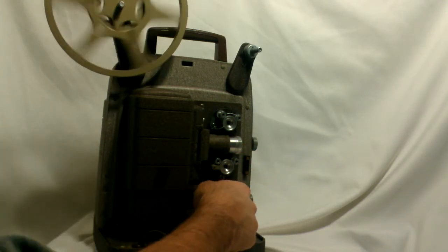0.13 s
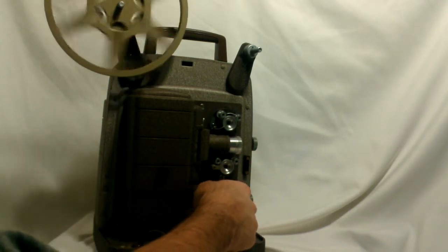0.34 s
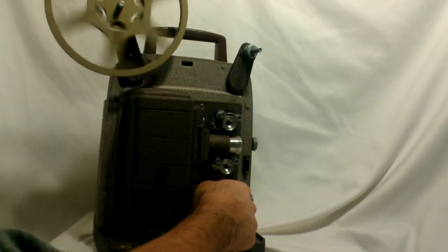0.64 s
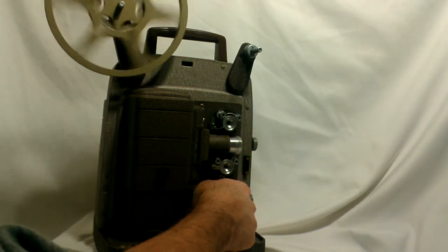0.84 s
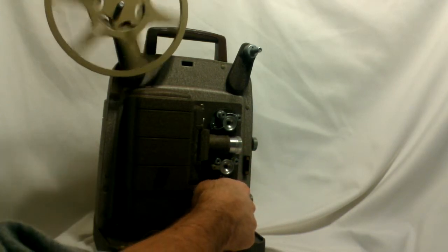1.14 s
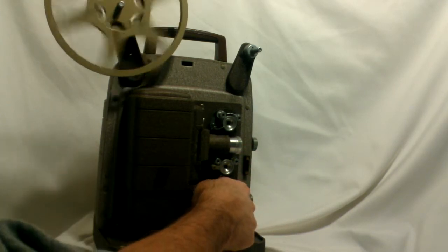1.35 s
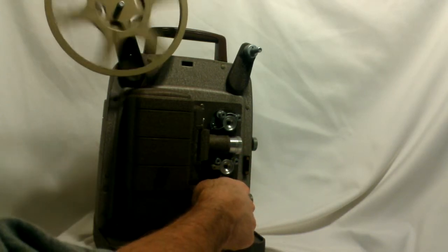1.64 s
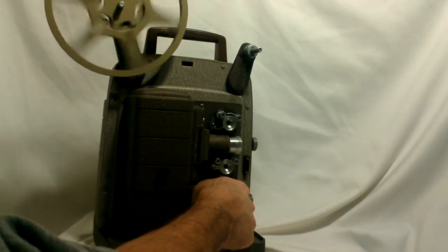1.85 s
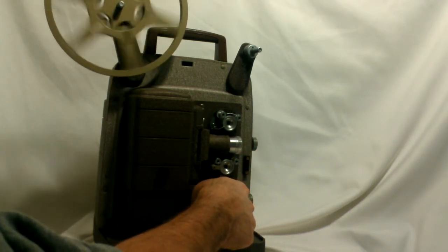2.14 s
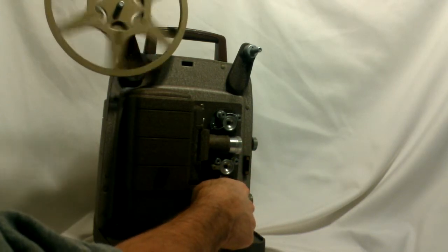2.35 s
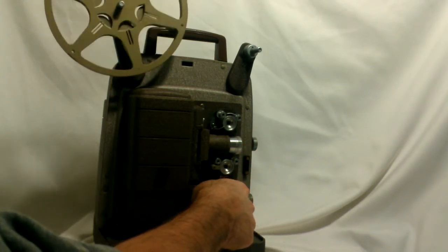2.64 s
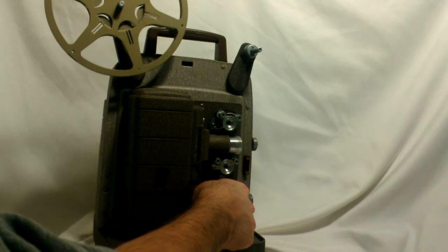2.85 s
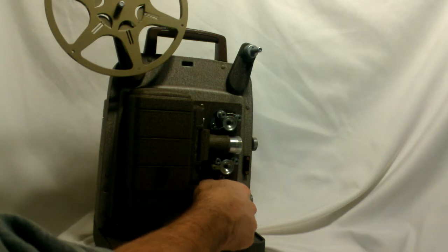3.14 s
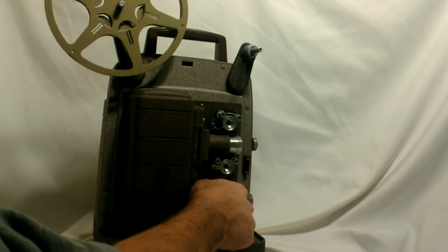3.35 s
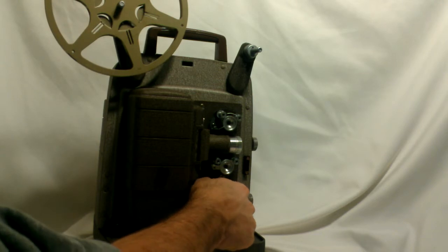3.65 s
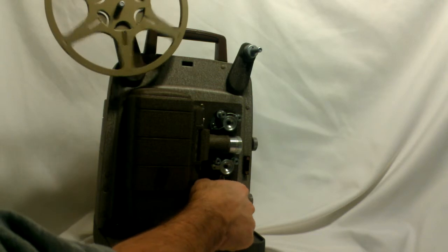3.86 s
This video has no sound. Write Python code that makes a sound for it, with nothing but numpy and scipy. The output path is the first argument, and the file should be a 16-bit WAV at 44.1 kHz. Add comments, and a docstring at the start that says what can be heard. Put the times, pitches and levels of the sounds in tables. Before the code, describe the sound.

An old film projector runs with a whirring, rattling clatter. A switch snaps off and the mechanism winds down to near silence, then another snap sets it surging again, close by in a small, fairly dry room.

```python
"""Film projector, off and on again

An old projector runs near a stereo microphone in a small draped room: gears rattle in the metal casing,
the claw ticks each frame, the motor hums and the fan whirs. A hand snaps the switch off and the works
coast down with faint ticks and creaks. The switch snaps on again and the works catch and surge."""
import sys
import numpy as np
from scipy import signal
from scipy.fft import rfft, irfft
from scipy.io import wavfile

SR = 44100
rng = np.random.default_rng(int(sys.argv[2]) if len(sys.argv) > 2 else 0)


def unload_wav(signal):
    """Save mono or channel-first audio to the path in sys.argv[1] as 16-bit WAV at rate SR, clipped to [-1, 1]."""
    wavfile.write(
        sys.argv[1],
        SR,
        np.round(np.clip(np.atleast_2d(signal).T, -1, 1) * 32767).astype(np.int16),
    )


N = 176400
TIME_S = np.arange(N) / SR
STOP_S, RESTART_S = 2.145, 3.62
STOPPED, LABOURING = TIME_S > STOP_S, TIME_S > RESTART_S   # each stays true to the end
COASTING = STOPPED & ~LABOURING
SPLIT_HZ = 1810   # divides the low and high bands of the works


def amp(db):
    """Decibels to gain."""
    return 10 ** (np.asarray(db) / 20)

def unit_rms(x):
    """Scales a signal to rms 1."""
    return x / np.sqrt(np.mean(x ** 2) + 1e-20)

def at_hz(curve, hz):
    """Reads a curve along a log frequency axis."""
    freqs, values = np.transpose(curve)
    return np.interp(np.log(hz + 1), np.log(freqs), values)

def filtered(x, kind, hz, order=2):
    """Butterworth filter."""
    return signal.sosfilt(signal.butter(order, hz, kind, fs=SR, output="sos"), x)

def drift(rate_hz):
    """Slow random wander, spread 1."""
    pole = np.exp(-80 * np.pi * rate_hz / SR)
    slow = signal.lfilter([1], [1, -2 * pole, pole * pole], rng.standard_normal(N // 40 + 2002))[2000:]
    return np.interp(np.arange(N) / 40, np.arange(len(slow)), unit_rms(slow))

def clicks_at(times_s, db):
    """An impulse train from times and levels."""
    out = np.zeros(N)
    np.add.at(out, np.clip(np.asarray(times_s) * SR, 0, N - 1).astype(int), amp(db))
    return out

def ring(clicks, hz, t60_s):
    """One mode: a unit click starts a dying sine of height 1."""
    decay, step = amp(-60 / (t60_s * SR)), 2 * np.pi * hz / SR
    return signal.lfilter([0, np.sin(step)], [1, -2 * decay * np.cos(step), decay ** 2], clicks + 1e-18)

def add_burst(out, start_s, db, noise, t60_s, rise_s=.0006):
    """Mixes in noise that rises quickly and dies away."""
    start, t = int(start_s * SR), np.arange(len(noise)) / SR
    envelope = (1 - np.exp(-t / rise_s)) * amp(db - 60 * t / t60_s)
    out[start:start + len(noise)] += (envelope * noise)[:N - start]

# How alike the two sides of the microphone hear diffuse sound: freq_hz, correlation
LEFT_RIGHT_LIKENESS = [(60, .85), (130, .92), (290, .97), (630, .87), (1380, .45), (3010, .1), (6590, .2),
                       (14400, 0)]

def stereo_noise(spectrum, size, likeness=LEFT_RIGHT_LIKENESS):
    """Coloured noise, partly shared by left and right; rms 1."""
    hz = np.arange(size // 2 + 1) * SR / size
    mid, side = rfft(rng.standard_normal((2, size)))
    alike = np.clip(at_hz(likeness, hz), -1, 1)
    pair = np.sqrt(1 + alike) * mid + np.sqrt(1 - alike) * side * [[1], [-1]]
    return unit_rms(irfft(amp(at_hz(spectrum, hz)) * pair, size))

# The quiet of the room: freq_hz, density_db
ROOM_TONE_SPECTRUM = [(18, -40), (30, -17.5), (63, -3.5), (130, -13), (354, -17.5), (624, -22), (1190, -28),
                      (1700, -27.5), (2260, -29.5), (14000, -32)]

def room_tone():
    """Faint rumble and hiss all round the microphone."""
    return amp(-68) * stereo_noise(ROOM_TONE_SPECTRUM, N, likeness=[(60, .3), (200, .034)])

ROOM_T60_S, TREBLE_T60_S, TREBLE_HZ = .16, .13, 6500

def draped_room(direct, wet_db):
    """Direct sound plus a wash from nearby walls; the drapes soak up the treble sooner."""
    t = np.arange(16384) / SR
    noise = stereo_noise([(50, 4), (15000, -6)], len(t))
    body = filtered(noise, "low", TREBLE_HZ) * amp(-60 * t / ROOM_T60_S)
    treble = filtered(noise, "high", TREBLE_HZ) * amp(-60 * t / TREBLE_T60_S)
    wash = (body - treble) * (t > .003)
    wash /= np.sqrt(np.sum(wash ** 2) / 2)
    return direct + amp(wet_db) * signal.fftconvolve(direct[None], wash, axes=1)[:, :N]

def cooling_air(low_edge_hz=6000):
    """Bright hiss of air, gone while the switch is off and stronger after the restart."""
    gain = amp(-72.5) * ~STOPPED + amp(-61) * LABOURING
    return gain * unit_rms(filtered(rng.standard_normal((2, N)), "high", low_edge_hz))

# Ticks as the works come to rest: start_s, level_db, low_edge_hz, high_edge_hz
SETTLING_TICKS = [(2.2523, -50, 1000, 3500), (2.629, -52, 3800, 5600), (2.669, -55, 3800, 5400),
                  (2.885, -66, 4000, 9000), (3.065, -61, 4500, 13000), (3.16, -67, 3500, 9000),
                  (3.335, -66, 3500, 7000)]
# Creaks among the ticks: start_s, length_s, low_ring_db, high_ring_db
SETTLING_CREAKS = [(2.732, .078, -63, -62), (2.92, .075, -63, -78)]

def settling(slips_per_s=130, low_ring_hz=1700, high_ring_hz=5050):
    """Faint ticks, and creaks made of quick uneven slips."""
    out = np.zeros(N)
    for start_s, db, low_hz, high_hz in SETTLING_TICKS:
        noise = unit_rms(filtered(rng.standard_normal(4096), "band", [low_hz, high_hz]))
        add_burst(out, start_s, db - 6, noise, t60_s=.097)
    for start_s, length_s, low_db, high_db in SETTLING_CREAKS:
        slips_s = start_s + np.cumsum(rng.uniform(.7, 1.3, 12)) / slips_per_s
        slip_db = rng.normal(0, 2, 12) - 200 * (slips_s > start_s + length_s)   # mutes slips past the end
        for hz, db in ((low_ring_hz, low_db), (high_ring_hz, high_db)):
            out += ring(clicks_at(slips_s, db + slip_db), hz, t60_s=.011)
    return out

# A push on the casing at each throw of the switch: start_s, strength_db
TABLE_THUMPS = [(2.152, -38), (3.637, -36)]

def table_thumps():
    """The casing rocks on the table with a soft, deep thud."""
    pushes = clicks_at(*np.transpose(TABLE_THUMPS))
    return filtered(ring(pushes, hz=53, t60_s=.3), "low", 60)

# Motor hum and gear mesh: pitch_hz, level_db, labouring_change_db
MOTOR_TONES = [(51.4, -68.5, -5.5), (120.3, -57, 0.5), (236, -69.5, 5), (361.5, -59, 10.5), (424, -49, 2),
               (482, -54.5, 7.5), (546.3, -58.5, 9), (770, -57, -0.5), (846, -60.5, 6), (1024, -58.5, -2)]

def motor(low_gain, waver_db=3, waver_hz=3.5):
    """Wavering tones that follow the low whir, drop out soon after the stop and return at the restart."""
    hum = np.zeros(N)
    for hz, db, change_db in MOTOR_TONES:
        gain = amp(db + change_db * LABOURING + waver_db * drift(8))
        cycles = np.cumsum(hz + waver_hz * drift(4)) / SR + rng.random()
        hum += gain * np.sin(2 * np.pi * cycles)
    sounding = (TIME_S < STOP_S + ROOM_T60_S) | LABOURING
    return hum * low_gain / low_gain[0] * sounding

# The fan's whir at speed: freq_hz, density_db
RUNNING_WHIR = [(24, -51), (40, -26.5), (115, 3), (163, -26.5), (261, 8.5), (333, -9), (427, -5),
                (507, -3.5), (830, 6.5), (939, -23), (2280, -10.5), (2710, -21), (3740, -16), (5020, -24.5),
                (6920, -26), (13500, -40.5), (14500, -58)]
# The whir while labouring up to speed: freq_hz, density_db
LABOURING_WHIR = [(24, -51), (40, -30.5), (118, -7.5), (167, -24), (267, 7), (325, -10), (471, 0.5),
                  (618, -5.5), (771, 3.5), (1500, -7.5), (1830, -15.5), (5150, -25.5), (14500, -63)]

def fan(low_gain, high_gain, flicker_db=2.5):
    """A flickering rush of air that falls back behind the coasting gears."""
    rush = np.where(LABOURING, amp(3.5) * stereo_noise(LABOURING_WHIR, N), stereo_noise(RUNNING_WHIR, N))
    rush *= amp(flicker_db * drift(32))
    low, high = (unit_rms(filtered(rush, kind, SPLIT_HZ)) for kind in ("low", "high"))
    return amp(-4 - 1.5 * COASTING) * (low_gain * low + high_gain * high)

# The works catch as they restart: start_s, level_db
DRIVE_CATCHES = [(3.7798, -34), (3.8314, -28), (3.8653, -28), (3.902, -21), (3.9282, -30.5), (3.9604, -13)]

def catches(tilt_db_per_octave=3):
    """Slack parts take up the drive in short knocks, brighter than the labouring whir."""
    spectrum = [(hz, db + tilt_db_per_octave * np.log2(hz)) for hz, db in LABOURING_WHIR]
    out = np.zeros(N)
    for start_s, db in DRIVE_CATCHES:
        add_burst(out, start_s, db - 14, stereo_noise(spectrum, 4096)[0], t60_s=.063)
    return out

# Modes of the metal casing: pitch_hz, width_hz, level_db
CASING_MODES = [(225.3, 11, -18.5), (276.2, 21, -10.5), (450.6, 17, -13.5), (561.3, 20, -15),
                (707, 37, -19.5), (754.3, 48.7, -12), (854, 52.2, -9), (1022.5, 75, -16.5),
                (1215, 240, -16.5), (1384, 60, -19.5), (1593, 210, -16), (2056, 110, -32), (2734, 86, -28),
                (3084, 148, -32.5), (4510, 520, -24.5), (4890, 230, -24), (5157, 130, -26.5),
                (5630, 280, -27.5), (5810, 250, -33), (6080, 250, -38), (7560, 300, -40)]

def casing(strike):
    """Rings each mode with fresh clicks from strike(band); returns band 0 (low) and band 1 (high)."""
    bands = np.zeros((2, N))
    for k, (hz, width_hz, db) in enumerate(CASING_MODES):
        band = int(hz > SPLIT_HZ)
        t60_s = np.log(1000) / np.pi / width_hz
        bands[band] += (-1) ** k * amp(db) * np.sqrt(width_hz) * ring(strike(band), hz, t60_s)
    return bands

def gears(low_gain, high_gain, surge_db=1.5, spread_db=3):
    """Teeth rattle the casing in surges, sparser and duller when coasting or labouring."""
    hits_per_s = np.select([LABOURING, COASTING], [400, 90], default=800)
    force = amp(surge_db * drift(14)) / np.sqrt(hits_per_s)

    def teeth(band):
        hits = (rng.random(N) < hits_per_s / SR) * rng.choice([-1, 1], N)
        return force * hits * amp(spread_db * np.minimum(rng.exponential(1, N), 5))

    low, high = casing(teeth)
    rattle = low_gain * unit_rms(low) + high_gain * unit_rms(high) * amp(-2 - 6 * STOPPED)
    return amp(-3.5 - 5.5 * LABOURING) * rattle

# The loudest knocks, running, coasting and catching: start_s, low_modes_db, high_modes_db
CASING_KNOCKS = [(.275, -31, -52), (.452, -35, -55), (0.858, -39.5, -55), (1.037, -30.5, -58),
                 (1.178, -36, -56), (1.266, -34.5, -54.5), (1.324, -30, -55), (1.5, -30.5, -49),
                 (1.734, -35.5, -55), (1.849, -31.5, -55), (1.996, -33.5, -39), (2.252, -51, -46),
                 (2.289, -54, -62), (2.343, -56.5, -51), (2.396, -51.5, -57.5), (2.465, -60, -60.5),
                 (2.555, -66, -64), (2.626, -68, -74), (2.668, -61, -74), (2.751, -62, -80),
                 (3.779, -43.5, -46), (3.831, -36.5, -35), (3.865, -35, -36), (3.903, -30.5, -27.5),
                 (3.912, -28, -42), (3.932, -25.5, -42), (3.959, -33, -27), (3.968, -25.5, -36),
                 (3.99, -32, -36)]

def knocks(spread_db=3, rebound_s=.004, rebound_db=-2, soften_hz=950):
    """Each knock and its rebound strike every casing mode with a strength of their own."""
    start_s, *band_db = np.transpose(CASING_KNOCKS)

    def blows(times_s, db):
        return clicks_at(times_s, db + rng.normal(0, spread_db, len(db)))

    low, high = casing(lambda band: blows(start_s, band_db[band])
                       + blows(start_s + rebound_s, band_db[band] + rebound_db))
    low_peak, high_peak = np.abs(casing(lambda band: clicks_at([0], [0]))).max(axis=1)   # of a unit blow
    return filtered(low, "low", soften_hz) / low_peak + high / high_peak

# Claw contacts within one frame: position_frames, low_modes_db, high_modes_db
CLAW_CONTACTS = [(.185, -9, -4), (.255, -7, 0), (.32, -7, -4), (.37, -12, -11), (.69, -14, -12),
                 (.73, 0, -11), (.785, -1, -15)]

def claw(low_gain, high_gain, frames=42, frames_per_s=17.14, jitter_s=.0003, coast_s=.21, spread_db=2):
    """The claw taps the casing in every frame; after the stop it comes slower, fainter and duller."""
    position, *band_db = np.transpose(CLAW_CONTACTS)
    steady_s = (np.arange(frames)[:, None] + position) / frames_per_s
    steady_s += rng.normal(0, jitter_s, steady_s.shape)
    speed = np.clip(1 - np.maximum(steady_s - STOP_S, 0) / coast_s, .05, 1)
    times_s = np.minimum(steady_s, STOP_S) - coast_s * np.log(speed)   # the speed dies exponentially
    frame_db = rng.normal(0, .7, (frames, 1))

    def contacts(band):
        db = band_db[band] + frame_db + rng.normal(0, spread_db, times_s.shape)
        return clicks_at(times_s.ravel(), db.ravel())

    rings = casing(contacts)
    low, high = rings / rings[:, :2 * SR].std(axis=1, keepdims=True)   # rms 1 at speed
    body = amp(-48) * low * low_gain / low_gain[0]
    treble = amp(-48.5 - 11 * STOPPED) * high * high_gain / high_gain[0]
    return body + treble

# Switch contacts, a cluster going off and a cluster going on: start_s, level_db
SWITCH_CONTACTS = [(2.1435, -16.5), (2.1473, -12.5), (2.1482, -11.5), (2.151, -28), (2.158, -43),
                   (2.166, -18.5), (2.175, -31.5), (3.6228, -10), (3.6255, -13.5), (3.6285, -21),
                   (3.634, -30), (3.642, -30), (3.649, -20), (3.657, -18)]
# The crack of switching off: freq_hz, density_db
OFF_CRACK = [(180, -35), (300, -18.5), (861, -17), (1360, -8.5), (1790, -17.5), (2140, -13), (2600, -14),
             (4020, -11), (5050, -1.5), (7100, -6), (14500, -34)]
# The crack of switching on: freq_hz, density_db
ON_CRACK = [(120, -41), (200, -0.5), (286, -8.5), (361, -20), (556, -28), (1100, -10.5), (1780, -29),
            (2740, 0), (3920, -10), (6030, 1.5), (13300, -29.5), (14500, -51)]
# Modes of the switch: pitch_hz, off_db, on_db, t60_s
SWITCH_MODES = [(560, -39, -11.5, .08), (746, -33, -6, 0.042), (1054, -26, -20, 0.02),
                (1320, -13, -43, .015), (1420, -15.5, -41, .015), (2780, -33, -23, 0.015),
                (3060, -27.5, -11, .01), (3330, -28, 1, .01), (4590, -5, -28, .03), (5100, -4.5, -18, .03),
                (5700, -11.5, -9, .02), (7040, -12, -20, 0.013), (7460, -27, -45, .25),
                (7600, -13.5, -11, .01)]

def switch(crack_db=1.5, ring_db=-12.5, low_cut_hz=230):
    """Each contact is a crack of noise and a blow on the modes of the switch."""
    out = np.zeros(N)
    for start_s, db in SWITCH_CONTACTS:
        crack = stereo_noise(OFF_CRACK if start_s < RESTART_S else ON_CRACK, 4096)[0]
        add_burst(out, start_s, db + crack_db, crack, t60_s=.016)
    times_s, contact_db = np.transpose(SWITCH_CONTACTS)
    for k, (hz, off_db, on_db, t60_s) in enumerate(SWITCH_MODES):
        mode_db = np.where(times_s < RESTART_S, off_db, on_db) + rng.normal(0, 3, len(times_s))
        out += (-1) ** k * ring(clicks_at(times_s, contact_db + mode_db + ring_db), hz, t60_s)
    return filtered(out, "high", low_cut_hz, order=4)

# Phase between the two microphone ports: freq_hz, left_lead_rad
PORT_PHASE = [(100, .05), (400, .15), (1000, 0.26), (2500, 2.11), (6000, 1.6), (14000, 1.5)]

def at_microphone(source, balance):
    """The two ports hear a source with a difference in level and phase."""
    hz = np.arange(N // 2 + 1) * SR / N
    side = np.array([[.5], [-.5]])
    response = amp(at_hz(balance, hz) * side) * np.exp(1j * at_hz(PORT_PHASE, hz) * side)
    return irfft(rfft(source) * response, N)

# Loudness of the works as they run, coast and restart: time_s, low_whir_db, high_whir_db
WORKS_LEVELS = [(0, -41, -46.5), (.5, -41.5, -46.5), (1.1, -40.5, -46), (1.6, -41.5, -46.5),
                (2.139, -41.5, -47.5), (2.25, -56.5, -54), (2.4, -66, -64.5), (2.55, -70, -69),
                (2.8, -96, -89), (3.62, -87, -99), (3.64, -45, -49), (3.74, -46, -52.5), (3.8, -44.5, -45),
                (3.88, -37.5, -36), (3.952, -34.5, -33), (4, -33.5, -29)]
# Where the works sit, heard from the microphone: freq_hz, left_minus_right_db
WORKS_BALANCE = [(60, -2), (200, 0), (500, -2), (1260, -4), (2320, -6), (4260, -1), (7840, -6.5),
                 (14400, 0.5)]
# Where the switch sits: freq_hz, left_minus_right_db
SWITCH_BALANCE = [(60, 8), (180, -2), (540, -1), (1610, -5), (4810, 1.5), (14400, -11)]

def scene():
    """The works sound close and fairly dry; the switch carries more of the room."""
    times_s, *band_db = np.transpose(WORKS_LEVELS)
    low_gain, high_gain = (amp(np.interp(TIME_S, times_s, db)) for db in band_db)
    whir = fan(low_gain, high_gain)
    rattle = gears(low_gain, high_gain)
    direct = whir + cooling_air() + motor(low_gain) + table_thumps()
    clatter = rattle + claw(low_gain, high_gain) + knocks() + catches() + settling()
    works = at_microphone(direct + draped_room(clatter, wet_db=-10.5), WORKS_BALANCE)
    snaps = at_microphone(draped_room(switch(), wet_db=-2), SWITCH_BALANCE)
    return works + snaps + room_tone()

def record(dry):
    """The microphone drops the deep bass, and the top is cut steeply."""
    low_cut_hz, high_cut_hz = 42, 14300
    thinned = filtered(dry, "high", low_cut_hz)
    return signal.sosfilt(signal.cheby2(16, 40, high_cut_hz, fs=SR, output="sos"), thinned)


dry = scene()
out = record(dry)
unload_wav(out)
```